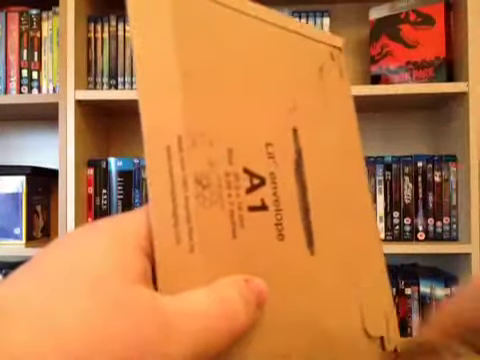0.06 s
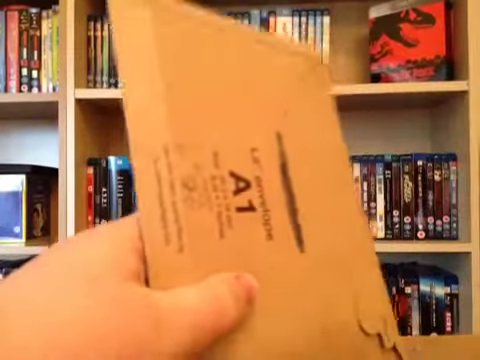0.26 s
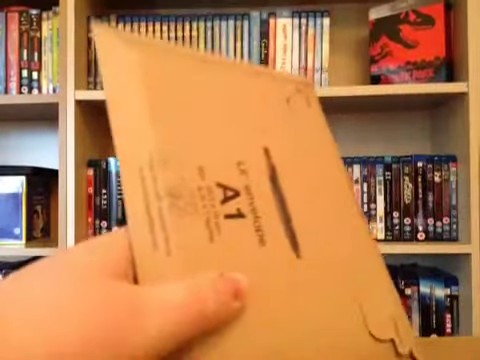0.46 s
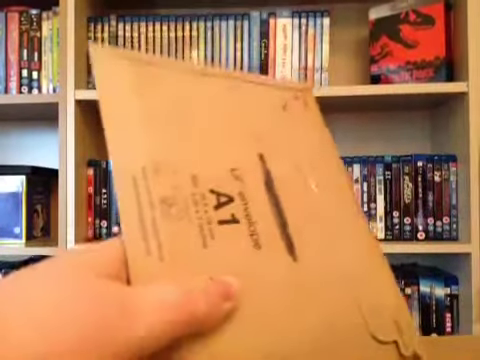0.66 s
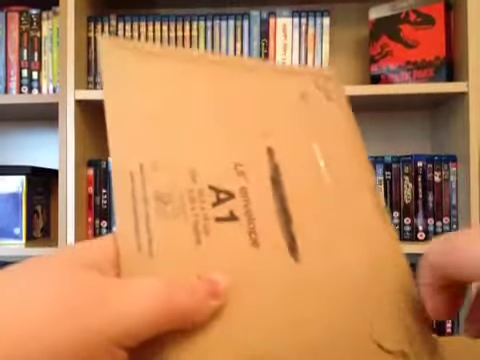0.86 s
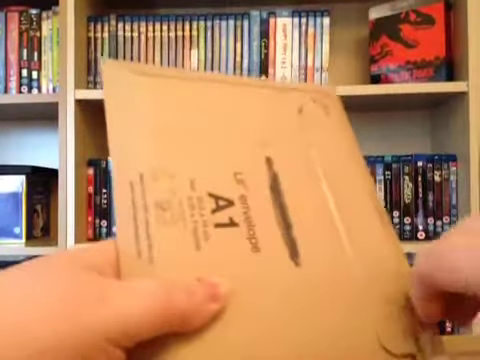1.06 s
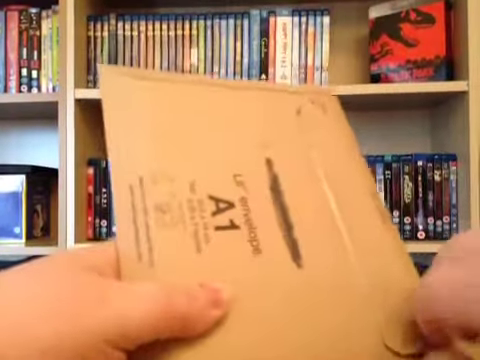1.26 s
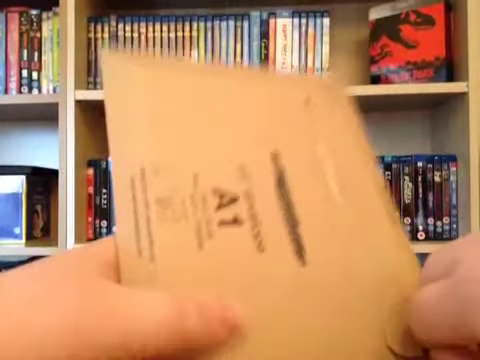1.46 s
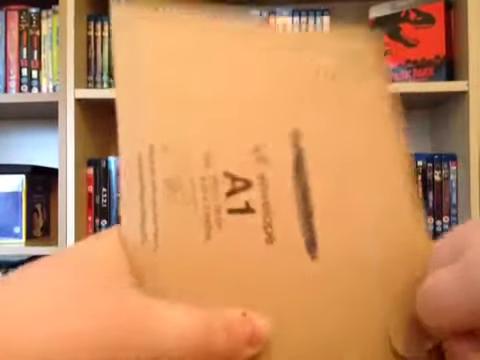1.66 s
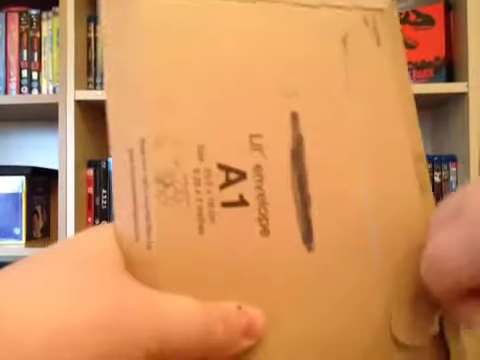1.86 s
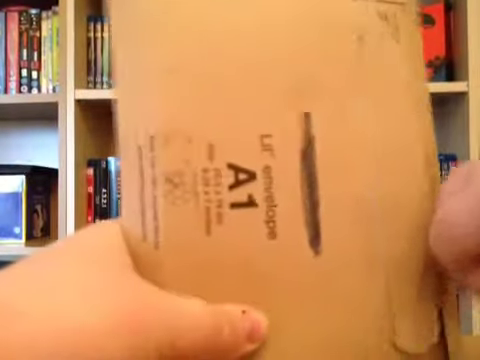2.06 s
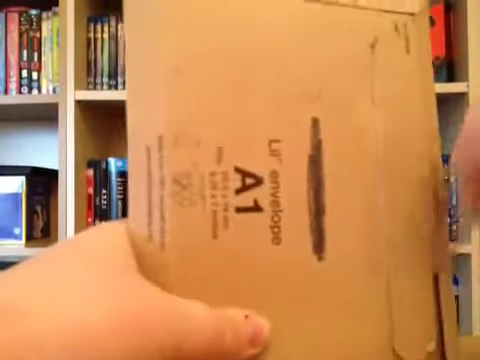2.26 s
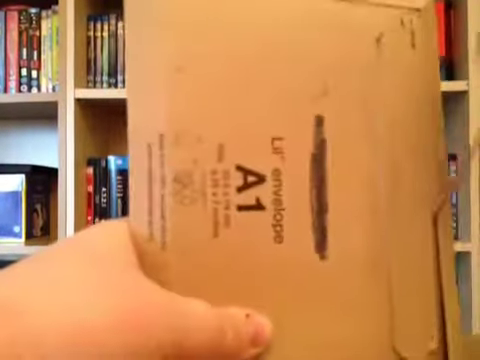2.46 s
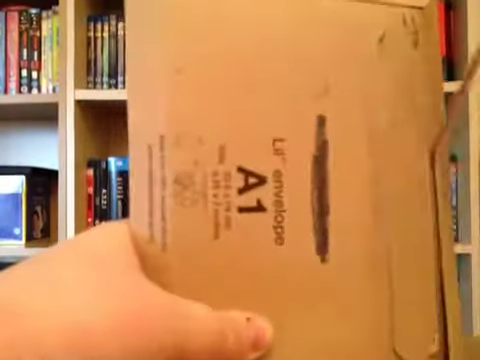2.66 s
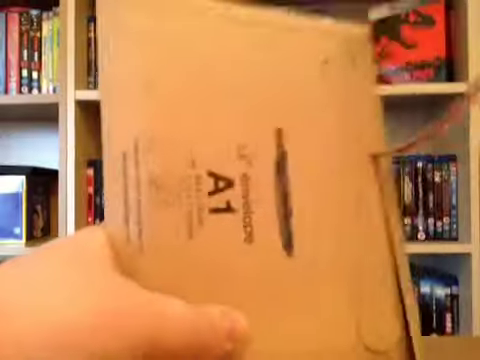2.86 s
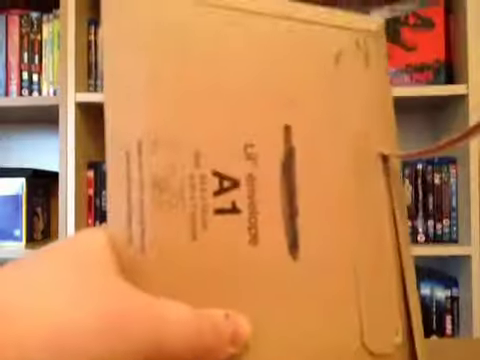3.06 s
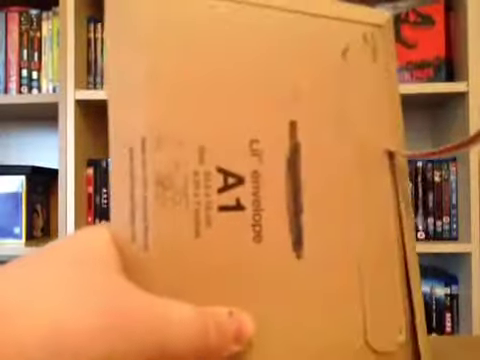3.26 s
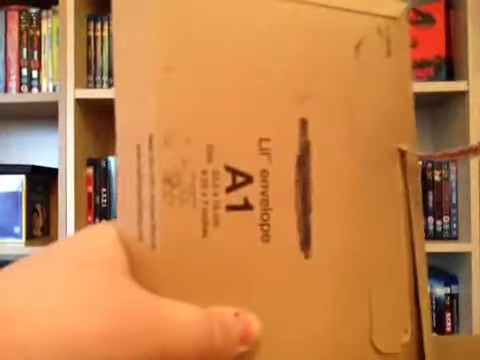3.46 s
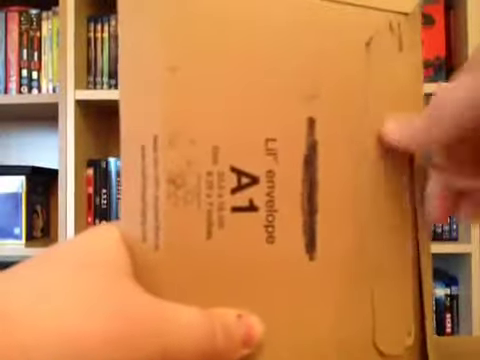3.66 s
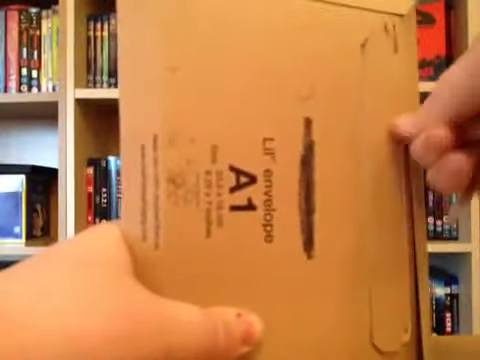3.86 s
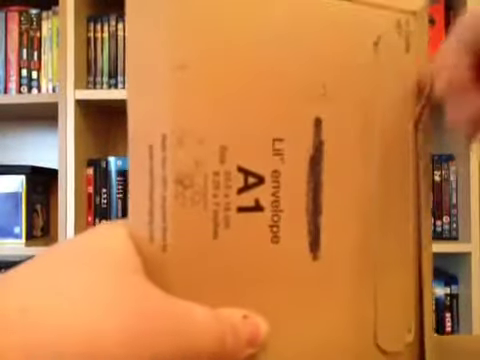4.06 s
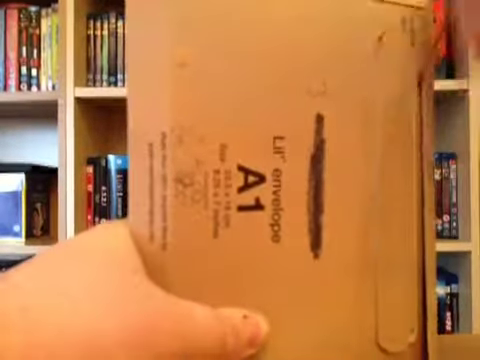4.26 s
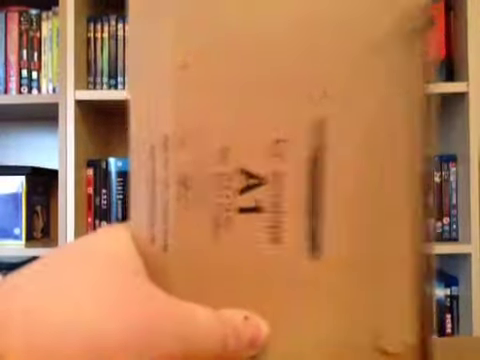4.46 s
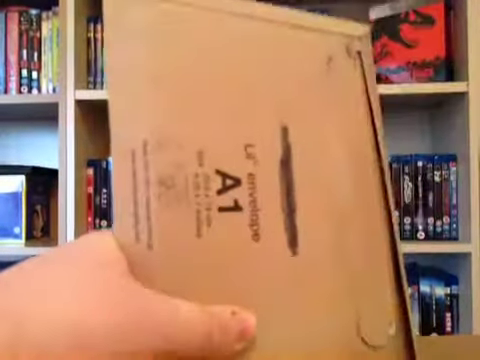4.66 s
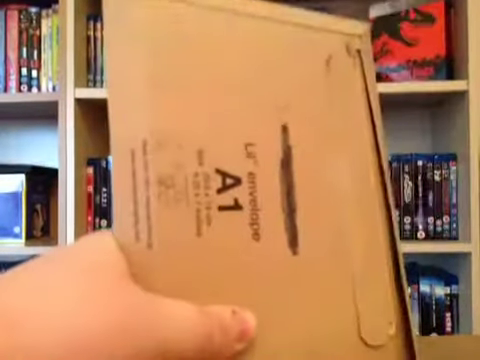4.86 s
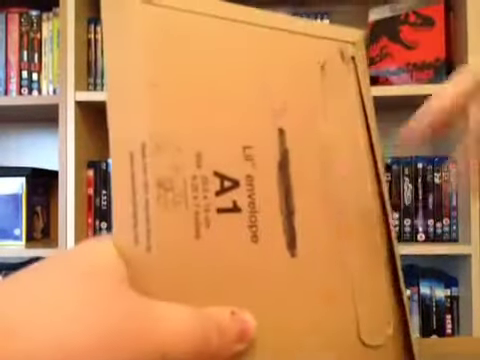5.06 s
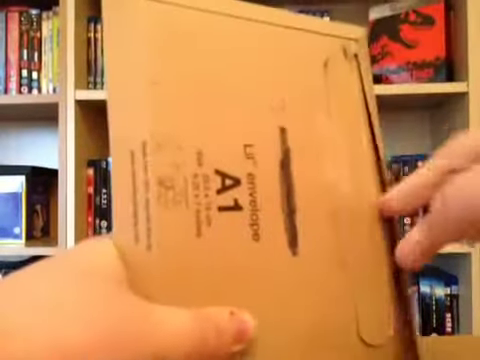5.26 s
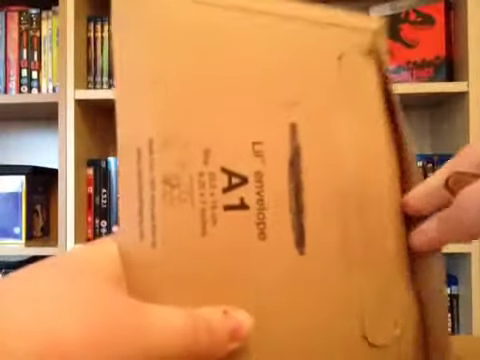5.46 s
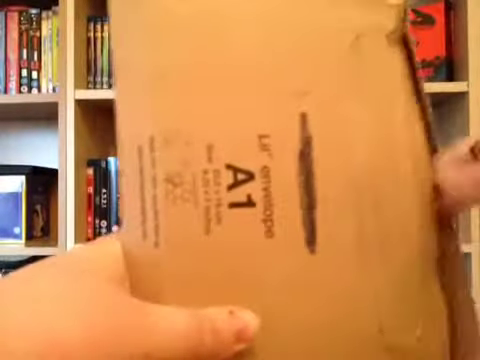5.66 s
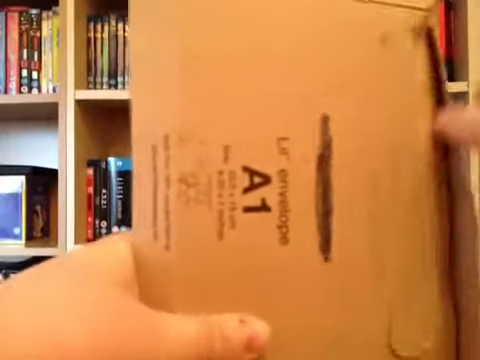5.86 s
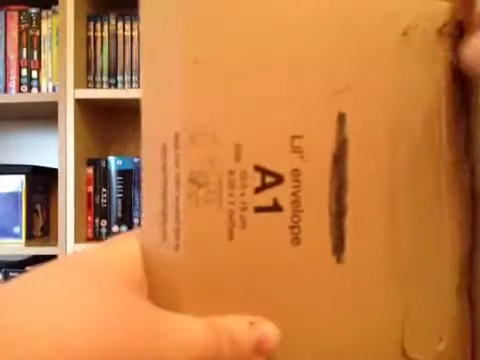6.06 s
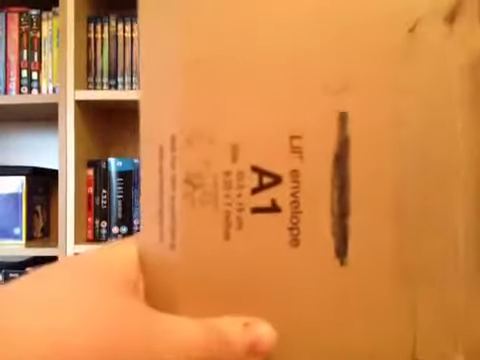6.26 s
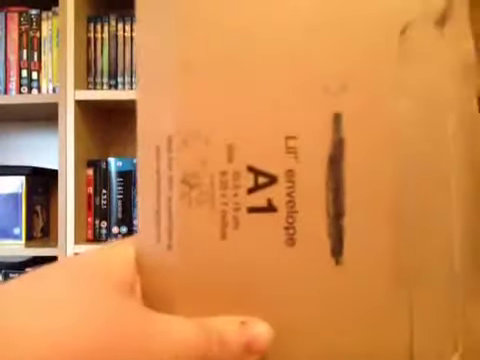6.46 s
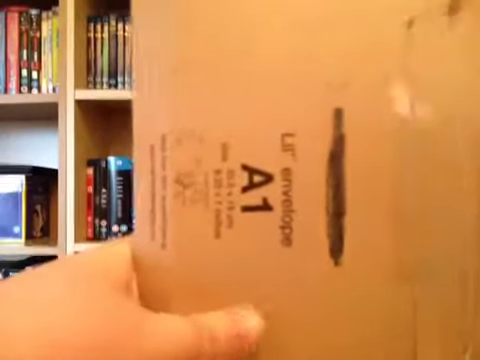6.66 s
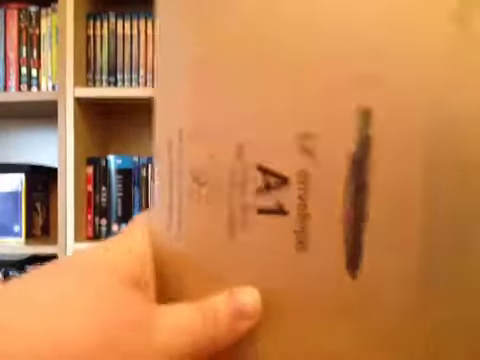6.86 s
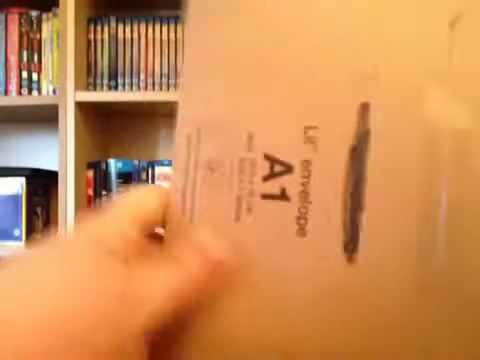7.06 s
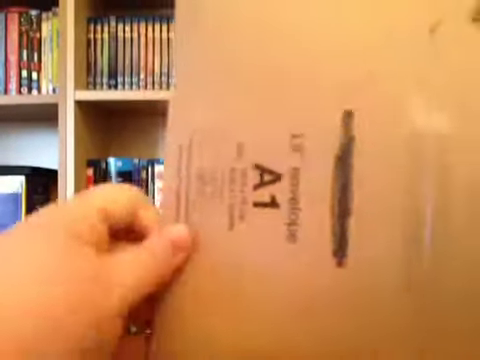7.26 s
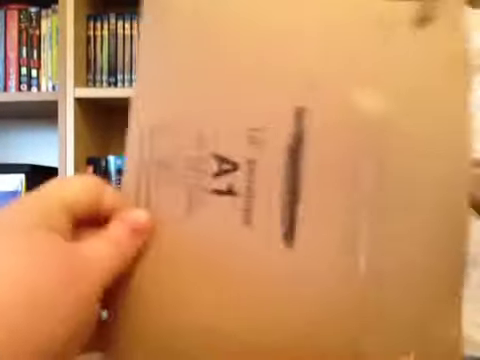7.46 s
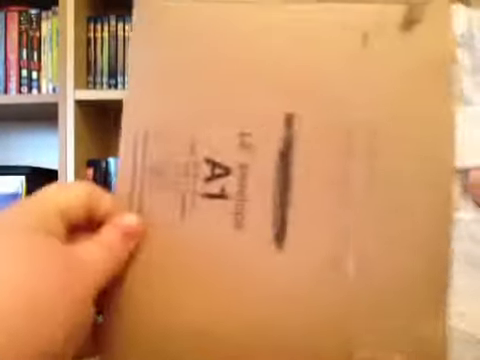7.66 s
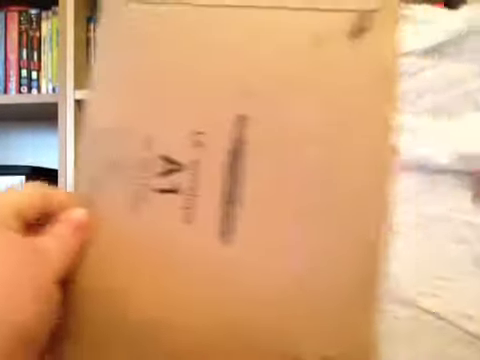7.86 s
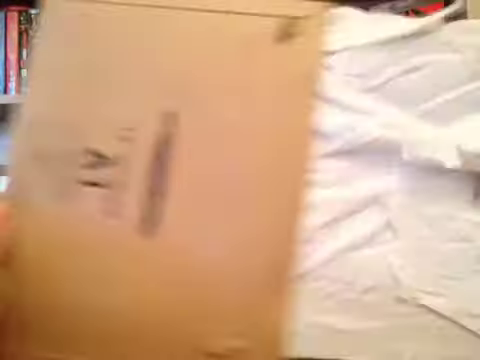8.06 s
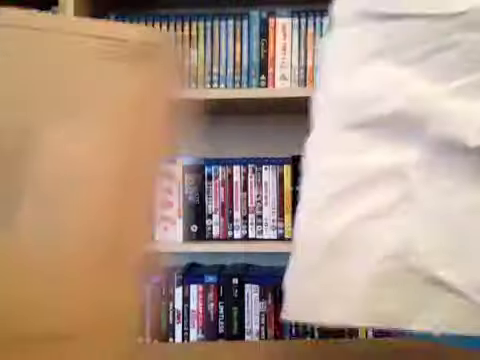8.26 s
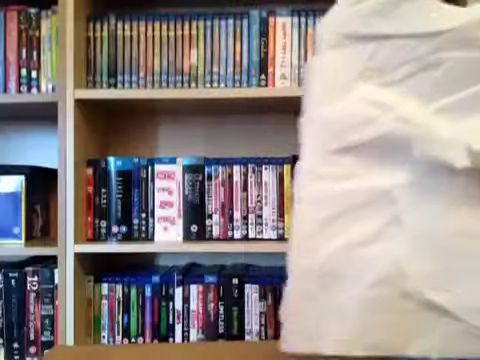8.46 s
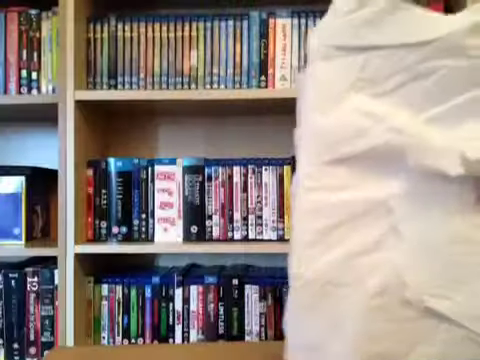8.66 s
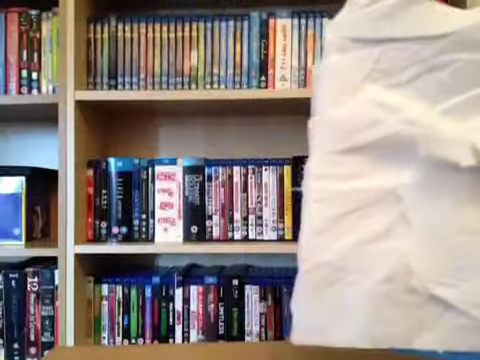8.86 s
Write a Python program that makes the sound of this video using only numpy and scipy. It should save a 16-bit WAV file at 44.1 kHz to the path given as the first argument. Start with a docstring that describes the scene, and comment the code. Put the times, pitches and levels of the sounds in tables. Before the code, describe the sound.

Close, dry handling of stiff cardboard in a small furnished room, over very faint room tone. At 0.0 a short scratch; at 0.2 a knife nicks the board, then clatters on the desk from 0.43 to 0.56, hard knocks with bright metallic clicks. Quiet rubbing follows. From 1.4 to 1.95 nails pick at the tab with dry ticks. A coarse, fibrous rip runs 1.96-2.7, with little rib taps. The loose strip creeps and snaps softly around 3.1-3.8; a second rip runs 3.93-4.45, ending in a snap. Faint brushing, then a fingertip skids at 5.25 and a snap lands at 5.37. Loud hollow pops and thumps hit at 5.67-5.8. Rubbing, snaps and bumps continue to 6.65. The packet scrapes out in pushes from 6.7 to 7.5, then a long draw from 7.6 to 8.1. Soft paper rustle at 8.4-8.8, a tiny snap at 8.9.

```python
"""A stiff cardboard mailer is opened close to the microphone in a small furnished room.
Hands rub the board, catching its fibres, as a knife nicks it and clatters on the desk, ringing desk and blade.
Nails pick at the tab, then two pulls rip the tear strip, fibre by fibre, and the freed strip creeps and brushes.
A fingertip skids under the flap, which pops open with snaps and thumps that ring the buckling board.
Last, a paper-wrapped packet scrapes out in pushes and one long draw, and its wrapping rustles in the hand."""
import sys
import numpy as np
from scipy import signal
from scipy.fft import rfft, irfft
from scipy.io import wavfile

SR = 44100
rng = np.random.default_rng(int(sys.argv[2]) if len(sys.argv) > 2 else 0)


def log_audio(samples):
    """Write samples as a 16-bit WAV file to the path given in sys.argv[1]."""
    # one column per channel
    frames = np.atleast_2d(samples).T
    # limit to full scale, then quantise
    limited = np.clip(frames, -1, 1)
    pcm = np.round(limited * 32767).astype(np.int16)
    wavfile.write(sys.argv[1], SR, pcm)


N = 392931
TIME = np.arange(N) / SR

# Room tone. Each row: frequency in Hz, relative level in dB.
AIR_COLOUR = [(50, -32), (110, -10), (250, 0), (450, -11), (1000, -12), (2500, -19), (9000, -23),
              (15500, -25)]
AIR_DB = -64

# Every stroke table below has the same columns. Each row: start in seconds, length in seconds,
# rasp level at mid-stroke in dB, swell over the stroke in dB, hiss in dB over the rasp.
# Blade and fingers rubbing over the board.
RUB_STROKES = [(0.0, 0.013, -36, -12.5, 5), (0.03, 0.17, -62, 5, -7), (0.26, 0.27, -50, -3, 2),
               (0.47, 0.13, -50, 8, -2), (0.635, 0.033, -47, 8.5, -1.5), (0.70, 0.14, -59, -3, -3),
               (0.83, 0.057, -49.5, 2.5, -5.5), (0.92, 0.96, -59.5, -10, -4), (1.01, 0.012, -54, -3, 1),
               (2.73, 0.064, -35.5, 0.5, -4.5), (2.85, 0.0089, -46, -1.5, -5.5),
               (3.33, 0.2, -61.5, -4, -2.5), (3.615, 0.17, -51.5, -0.5, 2),
               (3.835, 0.037, -42.5, 0.5, -2.5), (3.91, 0.24, -50, 2, 3.5), (4.38, 0.13, -38, -3, -2.5),
               (4.59, 0.012, -51.5, -8, -26), (5.235, 0.16, -44.5, 1.5, -6.5), (5.39, 0.071, -44, -0.5, -4),
               (5.53, 0.091, -45.5, 0, -0.5), (5.635, 0.041, -40, 8, -5.5), (5.762, 0.012, -38.5, 3, -1),
               (5.78, 0.063, -45, -5, 3), (5.87, 0.17, -48.5, 6, 2.5), (6.035, 0.011, -39.5, 4, 6.5),
               (6.168, 0.075, -42, -2, -2), (6.29, 0.17, -55.5, -12, 3), (6.44, 0.055, -43.5, 2.5, -2.5),
               (6.56, 0.053, -44, 2, -4), (6.66, 0.03, -42, 6, -5.5)]
# The holding hand chafing faintly on the board.
GRIP_STROKES = [(4.85, 3.25, -61, 0, 3)]
# Fingernails picking at the tab.
PICK_STROKES = [(1.255, 0.017, -71, 1, 15.5), (1.435, 0.14, -50, 2, 1.5), (1.605, 0.084, -39.5, -1.5, -2),
                (1.71, 0.096, -50, 2.5, 0.5), (1.86, 0.085, -52.5, -3, 1)]
# The freed strip sagging and creeping along the edge.
CREEP_STROKES = [(3.135, 0.125, -62.5, 2.5, 3.5)]
# The freed strip brushing off the edge.
STRIP_STROKES = [(4.58, 0.06, -67, -3, 12), (4.775, 0.11, -62, 7, 10)]
# A fingertip skidding under the flap.
SKID_STROKES = [(5.255, 0.013, -59, 6, 10), (5.281, 0.011, -48.5, 7, 9)]
# The packet sliding out in pushes.
SLIDE_STROKES = [(6.69, 0.0095, -40, 0, -11), (6.73, 0.17, -39, 1.5, -1), (6.945, 0.046, -41, 0, -3.5),
                 (7.02, 0.093, -45, -0.5, 4), (7.13, 0.08, -49, 0, -4), (7.295, 0.1, -38, 7, -1.5),
                 (7.42, 0.09, -44.5, -11.5, 0.5)]
# The last long draw of the packet.
DRAW_STROKES = [(7.603, 0.15, -43, 5.5, 0.5), (7.772, 0.29, -39.5, 4, 0.5), (8.073, 0.03, -34, 0, 2)]
# The paper wrapping rustling in the hand.
RUSTLE_STROKES = [(8.372, 0.01, -52, 1.5, 2.5), (8.51, 0.29, -63, -0.5, 8.5), (8.65, 0.026, -60.5, -1, 11)]

# Colour of each kind of contact. Each row: frequency in Hz, relative level in dB.
RUB_COLOUR = [(41, -54), (70, -28.5), (161, -5), (446, -8), (655, -4), (899, -4), (1100, -5), (2320, -6.5),
              (3410, -9.5), (3910, -13), (5870, -14), (13500, -20.5), (15500, -23)]
PICK_COLOUR = [(70, -28), (160, -18), (280, -12), (430, -21), (720, 0), (1250, -6.5), (1750, -1),
               (2400, -10), (3000, -3), (4300, -7.5), (6300, -2.5), (7700, 1.5), (9700, -3), (15500, -16.5)]
TEAR_COLOUR = [(41, -37), (70, -24), (100, -4.5), (165, 4.5), (232, -3.5), (278, -0.5), (446, -17),
               (768, -10), (1320, -17), (2600, -14), (3330, -19), (14200, -14.5), (15500, -21)]
PAPER_COLOUR = [(150, -20), (500, -12), (1100, -8), (2250, -7), (3000, -10.5), (7500, -10.5), (10000, -12),
                (15500, -12)]
SLIDE_COLOUR = [(41, -102), (70, -23.5), (161, -4), (436, -9.5), (800, -6), (1100, -5), (1810, -7),
                (2070, -7.5), (2490, -11.5), (3730, -14), (9640, -19), (13800, -18.5), (15500, -24)]
# Colour of a hard metal click and of breaking fibres. Each row: frequency in Hz, relative level in dB.
CLICK_COLOUR = [(1000, -47), (2800, -6), (4200, -6.5), (7600, -4.5), (9700, -7), (12000, -8.5),
                (15500, -2.5)]
CRACK_COLOUR = [(1000, -31), (2400, 5), (3300, 3.5), (6000, 1.5), (7600, 0), (9500, -4.5), (12000, -8),
                (15500, -9.5)]

# Steady resonances in the scraping. Each row: frequency in Hz, width in Hz, level in dB over the direct sound.
RUB_RESONANCES = [(292, 50, -31), (746, 88, -13.5), (1090, 94, -7.5), (7430, 1400, -14.5)]
TEAR_RESONANCES = [(159, 84, 7.5), (267, 30, -4), (1150, 69, -2.5), (14600, 850, -15)]
SKID_RESONANCES = [(4730, 440, 5), (5470, 500, 13), (6400, 600, 6)]
SLIDE_RESONANCES = [(180, 170, -20), (1050, 120, -3), (1390, 170, -25), (1640, 200, -12)]
PAPER_RESONANCES = [(2250, 260, 0), (7300, 1500, -10)]
# Resonances of the lengthening strip, one table for each pull, then of the emptying sleeve.
# Each row: first frequency in Hz, last frequency in Hz, width in Hz, level in dB over the direct sound.
STRIP_RESONANCES = [
    [(820, 830, 100, -7.5), (1710, 1700, 150, 2), (3040, 2700, 390, -2), (6200, 5300, 490, 1.5),
     (7300, 8600, 1400, -4.5)],
    [(1180, 1030, 85, -11), (2270, 3200, 1300, 3), (4300, 5600, 900, -2), (8160, 6100, 600, -5),
     (12200, 14000, 2100, -4.5)],
]
SLEEVE_RESONANCES = [(1160, 1090, 110, 5.5), (1200, 1500, 170, -2.5), (2040, 2030, 180, -10)]
SLEEVE_WANDER_OCTAVES = .05
# A pocket between the sheets, ringing under the rubbing hand and shifting as the board bends.
# Each row: time in seconds, frequency in Hz.
POCKET_PITCH = [(0.3, 1260), (0.6, 960), (0.67, 1750), (0.85, 1370), (1.15, 1670), (2.73, 1370),
                (2.87, 1150), (3.7, 1150), (3.85, 1100), (4.4, 1150), (4.5, 1450), (4.6, 1200),
                (5.28, 1100), (5.46, 1200), (5.58, 1100), (5.66, 1440), (5.8, 940), (6.1, 1350),
                (6.22, 1560), (6.47, 1100), (6.6, 1300), (6.69, 1380)]
POCKET_WIDTH_HZ, POCKET_DB = 290, -5
# skin squeaks faintly on the smooth face, at a pitch that wanders
SQUEAK_HZ, SQUEAK_WIDTH_HZ, SQUEAK_DB, SQUEAK_WANDER_OCTAVES = 7900, 610, -5.5, .1
CREEP_FIRST_HZ, CREEP_LAST_HZ, CREEP_WIDTH_HZ, CREEP_RING_DB = 2550, 3500, 300, 10

# The knife touching down and rattling on the desk. Each row: time in seconds, knock level in dB,
# metal click in dB over the knock, contact time in ms.
KNIFE_TOUCHES = [(0.209, -67, 14, 1), (0.235, -29, 3, 4), (0.248, -42.5, 7, 6.6),
                 (0.4307, -37.5, 11.5, 1.3), (0.44, -55, 24, 11), (0.4478, -23, -20, 1.8),
                 (0.4615, -21.5, 0.5, 1.2), (0.4945, -35, -8, 1.2), (0.5141, -30, -7.5, 1.2),
                 (0.524, -37.5, -3, 2.6), (0.529, -32, -3, 0.85), (0.534, -49, 11, 3.3),
                 (0.552, -32.5, -7.5, 3.4), (0.5622, -31.5, -11, 1.4)]
DESK_THUD_DB = -9.5   # relative to the knock
# The knife springing off the edge of the board. Each row: time in seconds, level in dB.
TWANGS = [(0.236, -29.5)]
# The mailer buckling or bumped by a hand. Each row: time in seconds, flex level in dB, knock in dB over the flex.
THUMPS = [(1.346, -50, -18), (2.699, -35, -3), (3.641, -46.5, 0), (3.845, -42.5, -8), (5.6749, -16.5, -2.5),
          (5.7857, -16.5, -6), (5.797, -28, -1), (6.134, -36.5, -24), (6.192, -33.5, -5), (6.473, -32, -20),
          (6.543, -47, 3), (6.716, -30.5, -26), (6.765, -37.5, -7), (6.925, -45, -10), (7.15, -44, -6),
          (7.379, -38, -17), (8.11, -40, -9)]
THUMP_CRACK_DB, THUMP_CONTACT_MS = -39, 2.24   # a soft contact: little crack relative to the flex
# Creases and fibres snapping. Each row: time in seconds, knock level in dB, crack in dB over the knock,
# crumple time in ms.
SNAPS = [(1.597, -36, -9, 3), (1.654, -42, -10, 3), (2.008, -54, -11, 0.45), (3.3125, -37, 7.5, 1.3),
         (3.428, -62.5, 6, 0.7), (3.489, -61.5, 5.5, 1.4), (3.607, -48, -1, 6), (3.641, -44.5, -3, 4),
         (3.763, -42.5, -15, 3.8), (3.844, -41, -10, 2), (3.861, -43, -10, 2), (3.916, -53, 13, 1.0),
         (4.409, -28.5, -9, 4.5), (4.419, -29, -5, 7.1), (4.738, -60, 8, 1.8), (5.212, -48, -5, 2.2),
         (5.545, -57, 10, 2), (5.606, -44, -4, 3), (5.371, -39, -3, 3), (5.3745, -28.5, -5.5, 2),
         (5.764, -34, -4, 4), (5.7685, -18, -2, 5.8), (6.009, -50, 4, 3), (6.037, -41, 3, 7),
         (6.054, -36, 1, 5), (6.0595, -26, 1, 4), (6.507, -35, -9.5, 1.06), (7.515, -50, -2, 3),
         (7.558, -38, -9, 5), (7.572, -45, -6, 9), (7.852, -37, -6, 1.5), (8.107, -38, 2, 6),
         (8.89, -54.5, -7, 2.1)]
SNAP_FLEX_DB = -13   # flexing of the mailer, relative to the knock
# A nail flicking off the edge of the tab. Each row: time in seconds, tick level in dB, knock in dB over the tick.
FLICKS = [(1.4332, -40.5, -6.5), (1.567, -42.5, -6.5), (1.666, -41, -4), (1.739, -45, -6),
          (1.761, -45, -14), (1.781, -43, -14), (1.848, -44.5, -10), (1.885, -44.5, -11), (1.964, -42, -7)]
# Stiff ribs of the board giving way under the strip. Each row: time in seconds, level in dB.
RIBS = [(2.065, -39), (2.11, -38), (2.157, -38), (2.262, -39), (2.283, -39), (2.305, -35), (2.408, -52),
        (2.497, -32), (2.565, -43), (4.16, -57)]

# Ringing bodies. Each row: frequency in Hz, relative strength in dB, 60 dB decay time in seconds.
# Low thud of the desk, ring of its top, and ring of the knife.
DESK_THUD_MODES = [(167, 0, 0.026), (313, -13, 0.017), (425, 10, 0.022)]
DESK_TOP_MODES = [(486, -16, 0.082), (690, -3.5, 0.053), (870, 4, 0.017), (1100, -7, 0.022),
                  (1170, 10, 0.021), (1360, 2.5, 0.033), (1840, -5, 0.028), (2570, 0, 0.021)]
BLADE_MODES = [(2700, -10, .02), (3900, -4, .016), (4650, -5, .018), (5600, -3, .015), (7350, 0, .028),
               (8100, -1, .025), (11200, -3, .012), (12900, -2, .014)]
# The longer ring when the knife springs free.
TWANG_MODES = [(536, -9, 0.44), (1190, 3, 0.22), (1440, -5, 0.25), (2670, -13, .1), (4740, -2, .1),
               (7200, 3, 0.2)]
# The whole mailer flexing like a drum, stiff bending of its face, and the short high ring of a crease.
FLEX_MODES = [(135, -1.5, 0.037), (163.8, 17, 0.042), (215, 0.5, 0.023), (259, 8.5, 0.053),
              (284, -2, 0.052), (353, -10.5, 0.025)]
PANEL_MODES = [(590, 5, 0.014), (732, -3.5, 0.023), (810, 9, 0.0085), (1100, 0, 0.032), (1515, 8, 0.0081),
               (1734, 5, 0.024), (2240, 2, 0.025)]
CREASE_MODES = [(2500, -9, 0.014), (3210, -15, 0.0071), (3790, -25, 0.0066), (4680, 43, 0.013),
                (6330, 20, 0.0051), (7580, -16, 0.0033)]
# Thin ring of the tab's edge, and ring of a rib.
FLICK_MODES = [(7270, 4, 0.011), (7900, 0, .018), (8650, -7, 0.014), (13800, 2, .01)]
RIB_MODES = [(696, -3, 0.037), (790, 7, 0.029), (960, -18, 0.01)]
DETUNE_OCTAVES = .04   # spread of each mode's pitch from blow to blow

# How hard the tear strip is pulled, one curve for each pull. Each row: time in seconds, level in dB.
PULLS = [
    [(1.96, -42), (1.98, -38.5), (2.03, -30), (2.062, -36.5), (2.085, -34.5), (2.54, -34), (2.608, -30),
     (2.68, -36), (2.71, -45), (2.76, -68)],
    [(3.93, -41), (3.966, -45.5), (3.985, -34), (4.046, -36.5), (4.066, -45.5), (4.14, -37.5), (4.2, -32),
     (4.25, -31.5), (4.35, -33.5), (4.39, -34), (4.42, -33), (4.46, -55)],
]
# How much each pull shakes the whole mailer, one curve for each. Each row: time in seconds,
# level in dB relative to the pull.
PULL_FLEX = [
    [(1.96, -39), (2.06, -18), (2.25, -11), (2.7, -10.5)],
    [(3.93, -10), (4.02, -5.5), (4.15, -7.5), (4.26, -4.5), (4.42, -5)],
]
# Hiss of each pull. Each entry: level in dB relative to the pull.
PULL_HISS_DB = [1, 0.5]
FULL_PULL_DB, TEAR_RASP_DB = -19, -3   # level of a steady pull; rasp relative to it
RASP_FOLLOWS, FLEX_FOLLOWS = 0.94, 0.84   # share of the pull's swing in dB
# bundles of fibres let go now and then, and jolt the strip harder than single fibres
BUNDLES_PER_S, BUNDLE_SPREAD_DB, BUNDLE_DB, BUNDLE_TOP_HZ = 130, 1.2, -6, 9000

# a scrape has three parts: flex of the mailer, rasp of its face above that, hiss of the fibres on top
FLEX_TOP_HZ, RASP_TOP_HZ = 450, 2500
SHEEN_HZ = 11100   # above this the hiss brightens with the level of a stroke
HISS_WAVER_SHARE = .45

# Room decay. Each row: frequency in Hz, 60 dB decay time in seconds.
ROOM_T60 = [(150, 0.25), (1000, 0.22), (4000, 0.21), (14000, 0.16)]
CUTOFF_HZ = 15600


def from_db(db):
    """Decibels to gain."""
    return 10 ** (np.asarray(db) / 20)


def rms_one(x):
    """Scale to rms 1."""
    return x / np.sqrt(np.mean(x ** 2) + 1e-20)


def at_hz(points, hz):
    """Read a table on a log-frequency axis."""
    at, value = np.transpose(points)
    return np.interp(np.log(np.maximum(hz, 1)), np.log(at), value)


def in_time(curve):
    """Join the points of a curve by straight lines."""
    return np.interp(TIME, *np.transpose(curve))


def cut(x, hz, kind, order=3):
    """Butterworth filter."""
    return signal.sosfilt(signal.butter(order, hz, kind, fs=SR, output="sos"), x)


def coloured(x, spectrum):
    """Causal (minimum-phase) filter with the given spectrum."""
    size = 4096
    log_gain = np.log(from_db(at_hz(spectrum, np.fft.rfftfreq(size, 1 / SR))))
    cepstrum = irfft(log_gain)
    # folding the cepstrum forward in time makes the phase minimal
    cepstrum[1:size // 2] *= 2
    cepstrum[size // 2 + 1:] = 0
    return signal.oaconvolve(x, irfft(np.exp(rfft(cepstrum))))[:len(x)]


def drift(rate):
    """Slow random wander of rms 1, heading for a new value `rate` times a second."""
    knots = rng.standard_normal(N // 10)
    return rms_one(np.interp(TIME * rate, np.arange(len(knots)), knots))


def resonate(x, hz, width):
    """Two-pole resonance with gain 1 on top."""
    r = np.exp(-np.pi * width / SR)
    poles = [1, -2 * r * np.cos(2 * np.pi * hz / SR), r * r]
    return signal.lfilter(np.array([1, 0, -1]) * (1 - r * r) / 2, poles, x)


def gliding(x, hz, width, size=512):
    """Two-pole resonance whose centre follows a curve, block by block."""
    out, state, r = np.zeros(N), np.zeros(2), np.exp(-np.pi * width / SR)
    zeros = np.array([1, 0, -1]) * (1 - r * r) / 2
    for i in range(0, N, size):
        poles = [1, -2 * r * np.cos(2 * np.pi * hz[i] / SR), r * r]
        out[i:i + size], state = signal.lfilter(zeros, poles, x[i:i + size], zi=state)
    return out


def swept(force, span, resonances, bend=1):
    """Add resonances that glide from a first to a last pitch over a span of time."""
    rings = 0
    for first_hz, last_hz, width, db in resonances:
        hz = bend * np.interp(TIME, span, [first_hz, last_hz])
        rings = rings + from_db(db) * gliding(force, hz, width)
    return force + rings


def clicks(per_s, spread_db):
    """Random clicks of uneven size; rms 1."""
    born = np.flatnonzero(rng.random(N) < per_s / SR)
    size_db = spread_db * np.minimum(rng.exponential(1, N)[born], 5)
    signs = rng.choice([-1, 1], N)[born]
    return rms_one(np.bincount(born, from_db(size_db) * signs, N))


def fibres(per_s, spread_db, smooth_db, catch_db, catch_rate):
    """Fibres snap or slip at random over smooth friction, in clumps as the board catches and lets go."""
    smooth = from_db(smooth_db) * rng.standard_normal(N)
    return (clicks(per_s, spread_db) + smooth) * from_db(catch_db * drift(catch_rate))


def stroke_gains(strokes, attack_db_per_s, release_db_per_s, flex_db):
    """Flex, rasp and hiss gains: each stroke fades in to its start, swells or slackens, then dies away."""
    t, power = TIME[::40], 0
    for s, length, db, swell_db, hiss_db in strokes:
        age = t - s
        held_db = db + swell_db * (np.clip(age / length, 0, 1) - .5)
        attack_db = attack_db_per_s * np.clip(-age, 0, 1)
        release_db = release_db_per_s * np.clip(age - length, 0, 1)
        gains = np.outer(from_db([flex_db, 0, hiss_db]), from_db(held_db - attack_db - release_db))
        power = power + gains ** 2
    return np.array([np.interp(TIME, t, gain) for gain in np.sqrt(power)])


def scrape(force, gains, colour, resonances, waver_db, sheen_slope, even_db):
    """The contact force flexes the mailer, rasps in its face and hisses straight from the fibres."""
    rings = sum(from_db(db) * resonate(force, hz, width) for hz, width, db in resonances)
    sound = coloured(force + rings, colour)
    flex = rms_one(cut(sound, FLEX_TOP_HZ, "low"))
    rasp = rms_one(cut(sound, [FLEX_TOP_HZ, RASP_TOP_HZ], "band"))
    hiss = rms_one(cut(sound, RASP_TOP_HZ, "high"))
    # a stroke that hisses louder is also brighter; at even_db the brightness is unchanged
    sheen = np.clip((gains[2] / from_db(even_db) + 1e-9) ** sheen_slope, .5, 2)
    hiss = cut(hiss, SHEEN_HZ, "low") + sheen * cut(hiss, SHEEN_HZ, "high")
    parts = zip(gains, (flex, rasp, hiss), (1, 1, HISS_WAVER_SHARE))
    return sum(gain * part * from_db(share * waver_db * drift(40)) for gain, part, share in parts)


def struck(modes, t, scatter_db):
    """Ring of a set of modes; each blow varies the strength of each, and a little its pitch."""
    hz, db, t60 = np.transpose(modes)[:, :, None]
    strength = from_db(db + scatter_db * rng.standard_normal(db.shape))
    hz = hz * 2 ** (DETUNE_OCTAVES * rng.standard_normal(hz.shape))
    decay = np.exp(-np.log(1000) * t / t60)
    return np.sum(strength * decay * np.cos(2 * np.pi * hz * t), axis=0)


def blow(x, db):
    """Set the level of a blow: its energy as if spread over a hundredth of a second."""
    return from_db(db) * x / np.sqrt(np.sum(x ** 2) / (.01 * SR))


def blows(events, low_modes, mid_modes, high_modes, crack_colour, crumple_share, ring_db, grit_db, tail_db, tail_s):
    """One jolt starts the low modes; a short run of tiny impacts rings the higher ones and cracks on top."""
    out, t = np.zeros(N + SR), np.arange(SR // 5) / SR
    for s, low_db, knock_db, crack_db, contact_ms in events:
        grit = rng.standard_normal(len(t)) * from_db(grit_db * rng.standard_normal(len(t)))
        # the impacts are densest in the middle of the contact, at age 1
        age = t * 2000 / max(contact_ms, .3)
        burst = grit * (age * np.exp(1 - age) + from_db(tail_db) * np.exp(-t / tail_s))
        burst = burst / np.linalg.norm(burst)
        jolt = crumple_share * burst + (np.arange(len(t)) == np.argmax(age > 1 / 2))
        low = struck(low_modes, t, scatter_db=2.0)
        low = cut(cut(low, 423, "low", order=2), 188, "high", order=2)
        knock = signal.fftconvolve(jolt, struck(mid_modes, t, scatter_db=3))[:len(t)]
        # a blow with little crack is a soft one and misses the higher modes
        soft_hz = np.clip(2800 * from_db(0.61 * (crack_db - knock_db)), 800, 3500)
        knock = cut(cut(knock, soft_hz, "low", order=2), 387, "high", order=2)
        ring = signal.fftconvolve(burst, struck(high_modes, t, scatter_db=3))[:len(t)]
        ring = cut(ring, RASP_TOP_HZ, "high", order=2)
        crack = blow(coloured(burst, crack_colour), crack_db) + blow(ring, crack_db + ring_db)
        start = int(s * SR)
        out[start:start + len(t)] += blow(low, low_db) + blow(knock, knock_db) + crack
    return out[:N]


def ringing(events, modes, scatter_db):
    """Clean taps that set one table of modes ringing."""
    out, t = np.zeros(N), np.arange(SR // 3) / SR
    for s, db in events:
        start = int(s * SR)
        ring = struck(modes, t, scatter_db) * np.clip(t * 1000, 0, 1)   # 1 ms fade-in
        out[start:start + len(t)] += blow(ring, db)
    return out


def room_tone():
    """Steady noise with the colour of the room's air."""
    return from_db(AIR_DB) * rms_one(coloured(rng.standard_normal(N), AIR_COLOUR))


def rubbing():
    """Blade and hands catch the fibres; skin squeaks and a pocket between the sheets rings along."""
    force = fibres(per_s=1600, spread_db=3, smooth_db=0, catch_db=1.3, catch_rate=150)
    squeak_hz = SQUEAK_HZ * 2 ** (SQUEAK_WANDER_OCTAVES * drift(5))
    force = force + from_db(SQUEAK_DB) * gliding(force, squeak_hz, SQUEAK_WIDTH_HZ)
    force = force + from_db(POCKET_DB) * gliding(force, in_time(POCKET_PITCH), POCKET_WIDTH_HZ)
    gains = stroke_gains(RUB_STROKES + GRIP_STROKES, attack_db_per_s=472.0, release_db_per_s=292.0, flex_db=-12.5)
    return scrape(force, gains, RUB_COLOUR, RUB_RESONANCES, waver_db=2, sheen_slope=0.024, even_db=-34)


def knife_clatter():
    """Every touch of the knife thuds in the desk, knocks on its top and clicks in the blade."""
    events = [(s, db + DESK_THUD_DB, db, db + click_db, ms) for s, db, click_db, ms in KNIFE_TOUCHES]
    return blows(events, DESK_THUD_MODES, DESK_TOP_MODES, BLADE_MODES, CLICK_COLOUR,
                 crumple_share=0.041, ring_db=-6.5, grit_db=6.0, tail_db=-48, tail_s=0.0072)


def knife_twang():
    """The knife springs off the edge of the board and leaves a longer ring."""
    return ringing(TWANGS, TWANG_MODES, scatter_db=0.0)


def edge_fibres():
    """Sparse fibres catching in quick clumps, under a nail, a fingertip or the strip's edge."""
    return fibres(per_s=2000, spread_db=2, smooth_db=0, catch_db=2.2, catch_rate=220)


def picking():
    """Nails catch fibres at the tab; later the freed strip brushes off the edge in the same way."""
    gains = stroke_gains(PICK_STROKES + STRIP_STROKES, attack_db_per_s=594, release_db_per_s=251, flex_db=-13.0)
    return scrape(edge_fibres(), gains, PICK_COLOUR, [], waver_db=1.1, sheen_slope=0.2, even_db=-78)


def board_blows():
    """The mailer is jolted and rings: snaps are led by knock and crack, thumps by flex."""
    events = [(s, db + SNAP_FLEX_DB, db, db + crack_db, ms) for s, db, crack_db, ms in SNAPS]
    events += [(s, db, db + knock_db, db + THUMP_CRACK_DB, THUMP_CONTACT_MS) for s, db, knock_db in THUMPS]
    return blows(events, FLEX_MODES, PANEL_MODES, CREASE_MODES, CRACK_COLOUR,
                 crumple_share=1.0, ring_db=-19, grit_db=5.5, tail_db=-19.5, tail_s=0.015)


def flicks():
    """Each flick is a bright tick of the tab with a small knock in the board behind it."""
    events = [(s, db + knock_db + SNAP_FLEX_DB, db + knock_db, db - 6, 1.5) for s, db, knock_db in FLICKS]
    return blows(events, FLEX_MODES, PANEL_MODES, FLICK_MODES, PICK_COLOUR,
                 crumple_share=1.0, ring_db=5, grit_db=-1.5, tail_db=-27, tail_s=.01)


def bundles():
    """Each bundle of fibres parts in a dull crackle about a millisecond long."""
    crackle = clicks(BUNDLES_PER_S, BUNDLE_SPREAD_DB) ** 2
    power = signal.lfilter([1], [1, -np.exp(-1000 / SR)], crackle + 1e-18)
    noise = np.sqrt(power) * rng.standard_normal(N)
    return from_db(BUNDLE_DB) * rms_one(cut(noise, BUNDLE_TOP_HZ, "low", order=1))


def pull_gains(pull, flex, hiss_db, fade_s):
    """Gains of flex, rasp and hiss in time: all follow the pull, the hiss most closely."""
    effort_db = in_time(pull) - FULL_PULL_DB
    first_s, last_s = pull[0][0], pull[-1][0]
    gate = np.clip(.5 + np.minimum(TIME - first_s, last_s - TIME) / fade_s, 0, 1)
    flex_db = in_time(flex) + FLEX_FOLLOWS * effort_db
    rasp_db = TEAR_RASP_DB + RASP_FOLLOWS * effort_db
    return gate * from_db(FULL_PULL_DB) * from_db([flex_db, rasp_db, hiss_db + effort_db])


def tearing():
    """Fibres rip densely under each pull, singly and in bundles, and ring the lengthening strip."""
    out = 0
    ripping = fibres(per_s=2200, spread_db=2.3, smooth_db=3, catch_db=1.1, catch_rate=260) + bundles()
    for pull, resonances, flex, hiss_db in zip(PULLS, STRIP_RESONANCES, PULL_FLEX, PULL_HISS_DB):
        force = swept(ripping, [pull[0][0], pull[-1][0]], resonances)
        gains = pull_gains(pull, flex, hiss_db, fade_s=0.025)
        out = out + scrape(force, gains, TEAR_COLOUR, TEAR_RESONANCES, waver_db=.8, sheen_slope=0.13, even_db=-44)
    return out


def rib_taps():
    """Stiff ribs give way under the strip, each with a short ring."""
    return ringing(RIBS, RIB_MODES, scatter_db=3)


def sliding_fibres():
    """Dense, even fibre slips of a surface sliding along."""
    return fibres(per_s=4400, spread_db=0.5, smooth_db=-1.0, catch_db=0.5, catch_rate=250)


def creeping():
    """The sagging strip scrapes faintly; its one resonance rises as the free length shortens."""
    s, length = CREEP_STROKES[0][:2]
    resonance = (CREEP_FIRST_HZ, CREEP_LAST_HZ, CREEP_WIDTH_HZ, CREEP_RING_DB)
    force = swept(sliding_fibres(), [s, s + length], [resonance])
    gains = stroke_gains(CREEP_STROKES, attack_db_per_s=453, release_db_per_s=450, flex_db=-15)
    return scrape(force, gains, PAPER_COLOUR, [], waver_db=-0.5, sheen_slope=0.05, even_db=-51)


def skidding():
    """A fingertip skids under the flap, catching fibres and exciting three high resonances."""
    gains = stroke_gains(SKID_STROKES, attack_db_per_s=500, release_db_per_s=1000, flex_db=-8)
    return scrape(edge_fibres(), gains, PAPER_COLOUR, SKID_RESONANCES, waver_db=2, sheen_slope=0.05, even_db=-40)


def sliding():
    """The packet scrapes along the inside of the mailer in pushes."""
    gains = stroke_gains(SLIDE_STROKES, attack_db_per_s=376, release_db_per_s=353, flex_db=-12.0)
    return scrape(sliding_fibres(), gains, SLIDE_COLOUR, SLIDE_RESONANCES,
                  waver_db=1.9, sheen_slope=0.11, even_db=-12)


def drawing():
    """The long draw rings the emptying sleeve, whose resonances glide and wander."""
    bend = 2 ** (SLEEVE_WANDER_OCTAVES * drift(16))
    span = [DRAW_STROKES[0][0], DRAW_STROKES[-1][0]]
    force = swept(sliding_fibres(), span, SLEEVE_RESONANCES, bend)
    gains = stroke_gains(DRAW_STROKES, attack_db_per_s=398, release_db_per_s=396, flex_db=-16.0)
    return scrape(force, gains, SLIDE_COLOUR, [], waver_db=2, sheen_slope=0.35, even_db=-38)


def rustling():
    """The paper wrapping slips in the hand and hisses through its own resonances."""
    gains = stroke_gains(RUSTLE_STROKES, attack_db_per_s=499, release_db_per_s=300, flex_db=-28)
    return scrape(sliding_fibres(), gains, PAPER_COLOUR, PAPER_RESONANCES,
                  waver_db=1.0, sheen_slope=0.05, even_db=-49)


def room_echoes(x, first_echo_s=0.0034):
    """Diffuse echoes from shelves and walls, dying sooner in the treble."""
    t = np.arange(SR // 2) / SR
    white, edges = rng.standard_normal(len(t)), np.geomspace(70, 18000, 9)
    tail = 0
    for low, high in zip(edges, edges[1:]):
        t60 = at_hz(ROOM_T60, np.sqrt(low * high))
        tail = tail + cut(white * np.exp(-np.log(1000) * t / t60), [low, high], "band")
    tail = tail * np.clip(t / first_echo_s - 1, 0, 1)   # silent until the first echo
    return signal.fftconvolve(x, tail / np.linalg.norm(tail))[:N]


def scene():
    """Friction, the knife and the snapping board, with the room around them."""
    strokes = rubbing() + picking() + creeping() + skidding() + sliding() + drawing() + rustling()
    scraping = strokes + tearing() + rib_taps() + knife_twang()
    knife = knife_clatter()
    board = board_blows() + flicks()
    echoes = room_echoes(from_db(-13.0) * scraping + from_db(-12.0) * knife + from_db(-12.5) * board)
    return (scraping + knife + board + echoes + room_tone())[None]


def record(dry):
    """A small microphone: little deep bass, and the top is cut."""
    thin = cut(dry, 98.0, "high", order=2)
    return signal.sosfilt(signal.ellip(12, .1, 90, CUTOFF_HZ, fs=SR, output="sos"), thin)


dry = scene()
out = record(dry)
log_audio(out)
```